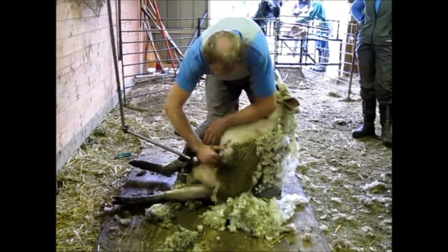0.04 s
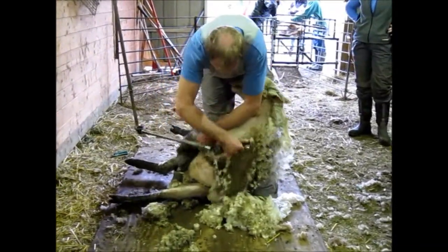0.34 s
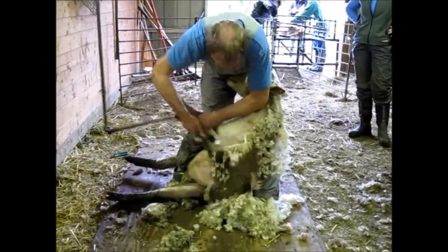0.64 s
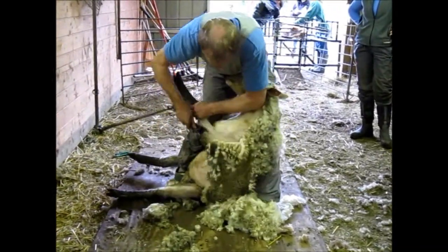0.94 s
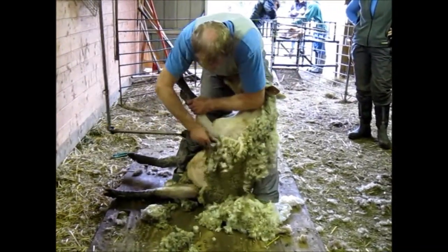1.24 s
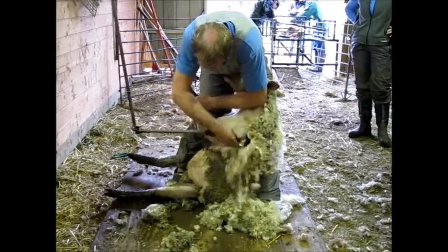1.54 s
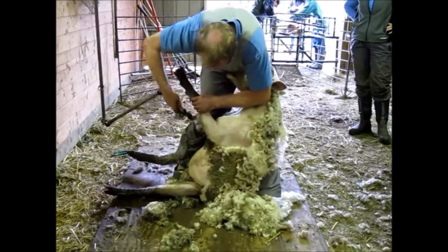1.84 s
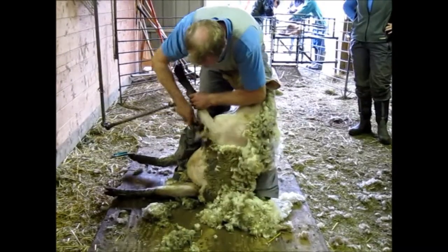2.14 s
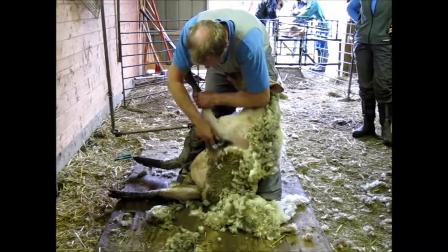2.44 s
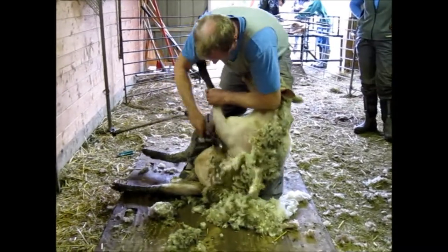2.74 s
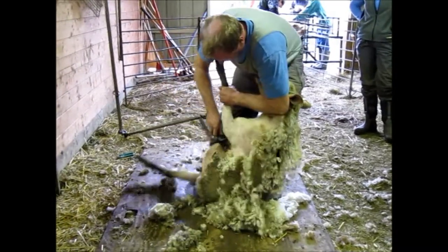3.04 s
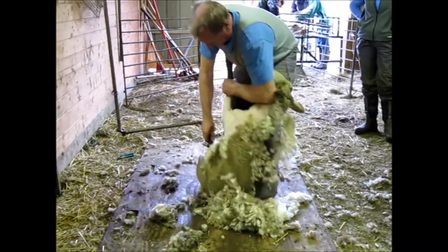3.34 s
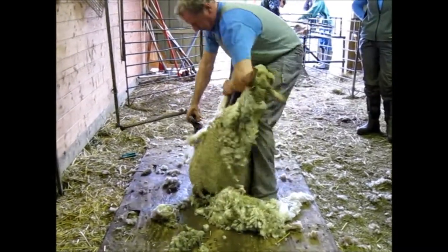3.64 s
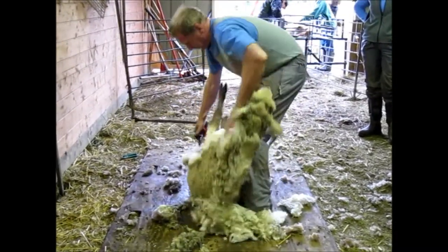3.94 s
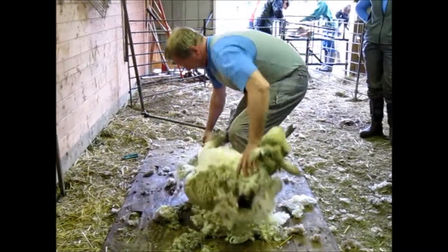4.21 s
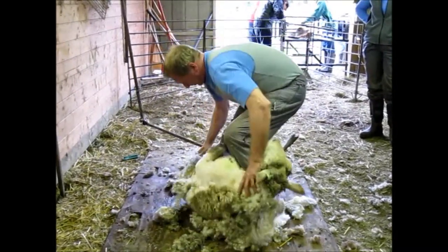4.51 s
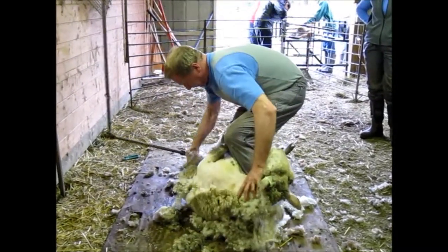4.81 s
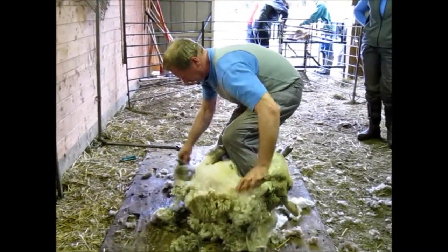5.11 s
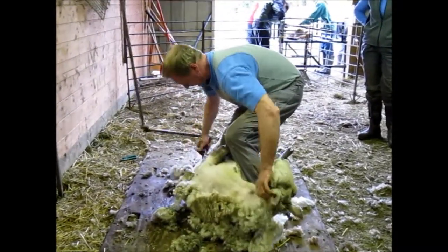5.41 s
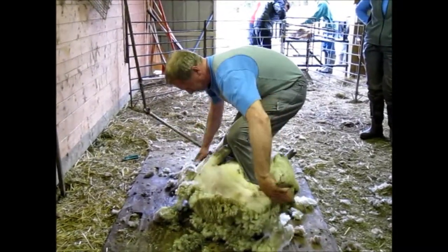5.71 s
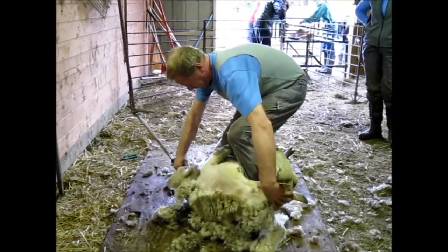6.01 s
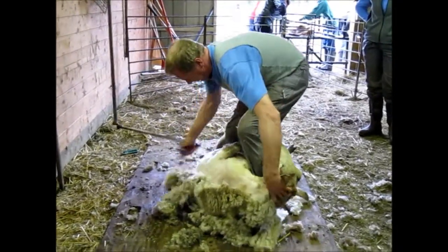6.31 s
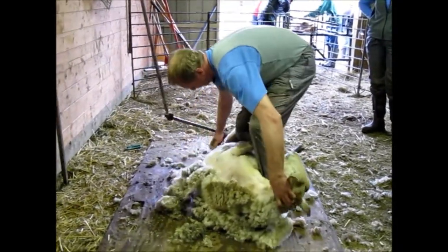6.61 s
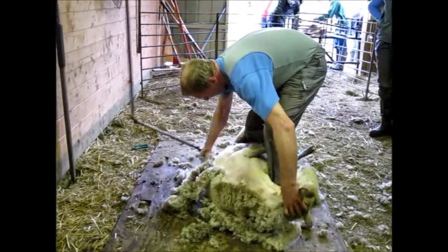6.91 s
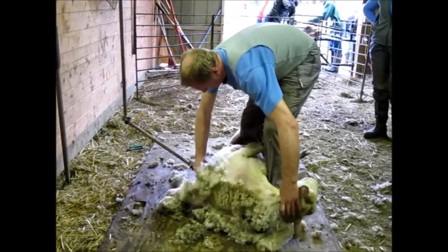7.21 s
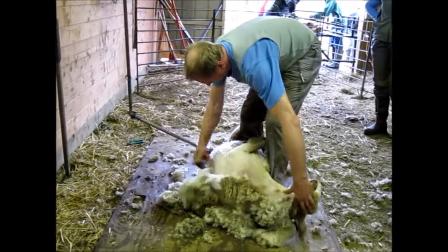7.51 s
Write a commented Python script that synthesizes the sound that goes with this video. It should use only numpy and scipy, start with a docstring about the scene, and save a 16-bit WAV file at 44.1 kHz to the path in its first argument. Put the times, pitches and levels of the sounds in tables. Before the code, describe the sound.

Steady, high metallic buzz of powered sheep shears, with a rattling drive shaft and a faint motor hum underneath.

```python
"""In a barn, a sheep is shorn with a shaft-driven handpiece. The cutter slides over the comb, two
strokes to a turn, and clacks in its play; friction and impact excite the resonances of the steel, which
now and then snags or squeaks. The jointed shaft rattles and whirs, and the motor hums overhead.
The sheep bumps on the board as it is turned, and a low handling rumble swells over the barn's air."""
import sys
import numpy as np
from scipy import signal
from scipy.fft import rfft, irfft, next_fast_len
from scipy.io import wavfile
from scipy.ndimage import uniform_filter1d

SR = 44100
rng = np.random.default_rng(int(sys.argv[2]) if len(sys.argv) > 2 else 0)


def wav_record(signal):
    """Record a signal, one row per channel, as 16-bit PCM in the file named by sys.argv[1]."""
    frames = np.transpose(np.atleast_2d(signal))
    bounded = np.clip(frames, -1, 1)
    # unit amplitude maps onto the largest positive 16-bit level
    quanta = np.round(bounded * 32767).astype(np.int16)
    wavfile.write(sys.argv[1], SR, quanta)


N = 332955
TIME = np.arange(N) / SR
FFT_SIZE = next_fast_len(N + SR)
FREQS = np.maximum(np.arange(FFT_SIZE // 2 + 1) * SR / FFT_SIZE, 1)


# Loudness of the blades as the handpiece is worked. Each row: time in seconds, relative level in dB.
BLADE_LEVEL = [(0.0, -43), (0.44, -42), (1.39, -43.5), (2.17, -42.5), (2.54, -45), (2.88, -42), (3.15, -44),
               (3.61, -43.5), (3.64, -41.5), (4.02, -44), (4.33, -41.5), (4.63, -45), (4.9, -44),
               (5.05, -47), (5.34, -42.5), (5.55, -45), (5.72, -42), (6.2, -44), (6.47, -42), (6.9, -43.5),
               (6.98, -42), (7.55, -43.5)]
# Contour of the blades' treble. Each row: time in seconds, relative level in dB.
TREBLE_LEVEL = [(0.0, -58.5), (0.27, -55.5), (4.06, -56), (5.38, -58), (5.72, -54), (6.18, -63.5),
                (6.5, -54), (6.88, -55), (7.08, -52.5), (7.13, -56.5), (7.53, -62), (7.55, -69)]
# Spectrum of steel sliding on steel. Each row: frequency in Hz, gain in dB.
STEEL_SPECTRUM = [(1000, -39), (2000, -11), (2600, 0), (3300, -2), (4300, 2), (6000, 0.5), (8000, -0.5),
                  (8900, 1.5), (9400, -7), (10800, -5), (12000, -3.5), (13000, -9.5), (14500, -14.5),
                  (15600, -21)]
# Modes of the handpiece. Each row: frequency in Hz, bandwidth in Hz, lift in dB.
HANDPIECE_MODES = [(2340, 100, 3), (3010, 90, 4.5), (3314, 66, 4.5), (3660, 130, 2), (4244, 93, 3.5),
                   (4407, 52, 4), (4930, 100, 0.5), (5320, 90, 2), (5750, 70, 1), (6200, 39, 4),
                   (6620, 99, 2.5), (7080, 280, 3.5), (9060, 120, 2.5), (9620, 180, 6.5), (10430, 480, 2.5)]
# The bare blades grind brighter for a moment. Each row: midpoint in seconds, length in seconds.
BLADE_GRINDS = [(3.68, 0.18), (6.453, 0.13)]

def blades(force, knocks):
    """Friction and impact excite the steel's modes; out of the wool, the comb plate rings more."""
    level_db, = curves(BLADE_LEVEL)
    bare = np.clip((TIME - 3.4) / 0.3, 0, 1)   # 0 in the fleece, 1 clear of it
    contact = force * grains(per_s=26000, spread_db=1.8) + from_db(-16.5) * knocks
    steel = rms_one(filtered(contact, body_response(STEEL_SPECTRUM, HANDPIECE_MODES)))
    bite_db = 3.2 * (force - force.mean()) + 1.3 * drift(40)   # harder contact is brighter
    grind_db = 2.5 * sum(swell(s, length) for s, length in BLADE_GRINDS)
    treble_db = about_mean(TREBLE_LEVEL) - about_mean(BLADE_LEVEL) - 1.1
    treble_band = 1 / (1 + (9200 / FREQS) ** 8)
    steel = band_gain(steel, treble_band, treble_db + grind_db + bite_db)
    cutter_db, plate_db = -1.2 + 0.2 * bare, 1.3 + bare
    steel = band_gain(steel, np.abs(resonance(4200, 520)) ** 2, cutter_db)
    for plate_hz in (3740, 6290):
        steel = band_gain(steel, np.abs(resonance(plate_hz, 130)) ** 2, plate_db + 1.3 * drift(21))
    return from_db(level_db + 1.36) * steel


def stroke_force(turns, bite_db, limp_db, uneven_db, shake_hz, shake_db):
    """Reciprocation: contact force peaks twice a turn, harder one way; the drive adds a slower shake."""
    angle = 2 * np.pi * turns
    bite = np.sin(2 * angle + 1) + np.sin(4 * angle + 2) / 3
    limp = np.cos(angle - 1)
    shake = np.sin(2 * np.pi * shake_hz * TIME + 0.33 * drift(0.93))
    return rms_one(from_db(bite_db * bite + limp_db * limp + shake_db * shake + uneven_db * drift(60)))


def clacks(turns, jitter_s, spread_db):
    """Backlash: the cutter crosses its play and strikes at each reversal, never quite on time."""
    reversals = np.flatnonzero(np.diff(np.floor(2 * turns)) > 0)
    lateness, strength = rng.standard_normal((len(reversals), 2)).T
    strikes = np.clip(reversals + (jitter_s * SR * lateness).astype(int), 0, N - 1)
    impulses = np.zeros(N)
    impulses[strikes] = from_db(spread_db * np.clip(strength, -2, 2))
    return rms_one(impulses)


# Thin ring of the comb's teeth. Each row: time in seconds, relative level in dB before scaling.
COMB_LEVEL = [(0.0, -52), (0.06, -59), (0.71, -52), (1.47, -58), (2.27, -51), (2.48, -55), (3.57, -52.5),
              (3.85, -61), (5.3, -56), (5.34, -49), (5.36, -50), (5.72, -66), (5.74, -53.5), (6.29, -59),
              (6.43, -48.5), (6.83, -58.5), (7.13, -52), (7.55, -57)]
# Their pitch shifts with the pressure on them. Each row: time in seconds, centre frequency in Hz.
COMB_CENTRE = [(0, 11380), (1.6, 11350), (2.1, 11600), (2.7, 11450), (3.5, 11200), (5.1, 11260),
               (5.8, 11200), (6.7, 11200), (7.55, 11200)]

def comb_ring(force):
    """Narrow-band noise: random contacts make the teeth sizzle around one moving frequency."""
    centre_hz, = curves(COMB_CENTRE)
    level_db = -55.2 + 1.4 * about_mean(COMB_LEVEL) + 0.8 * drift(12)
    contact = force ** 2 * grains(per_s=3300, spread_db=1.5)
    sizzle = rms_one(filtered(contact, 1 / (1 + 1j * FREQS / 210) ** 2))
    carrier = np.sin(2 * np.pi * np.cumsum(centre_hz) / SR + drift(120))
    return from_db(level_db) * sizzle * carrier


# Rattle of the shaft as the arm swings it. Each row: time in seconds, relative level in dB.
RATTLE_LEVEL = [(0.0, -54), (0.36, -51.5), (0.78, -54), (1.95, -53), (3.51, -54.5), (4.46, -54.5),
                (4.64, -57), (5.28, -56), (5.3, -53), (5.53, -53), (5.55, -55.5), (5.84, -52.5),
                (6.12, -56.5), (6.39, -54), (6.43, -51), (7.55, -55.5)]
# Spectrum of the rattle. Each row: frequency in Hz, gain in dB.
RATTLE_SPECTRUM = [(250, -20), (420, -18), (540, -12), (660, -3), (790, -13.5), (880, -1.5), (1100, -3),
                   (1250, -5), (1380, -9.5), (1520, -4.5), (1630, 2), (2200, 0.5), (2700, -17),
                   (4000, -17.5)]
# The elbow joint bends. Each row: midpoint in seconds, length in seconds, rise of its ring in dB.
ELBOW_FLEXES = [(.02, .16, 5), (.5, 0.48, 2), (3.2, 1, 1), (5.28, 0.47, 5.5), (6.78, 0.55, 1.5)]

def shaft_rattle(force, knocks):
    """Impact noise: loose joints strike their tube in step with the strokes; a bending elbow rings."""
    level_db, = curves(RATTLE_LEVEL)
    elbow_db = -1.3 + sum(db * swell(s, length) for s, length, db in ELBOW_FLEXES)
    contact = np.sqrt(force) * grains(per_s=5000, spread_db=2.0) + from_db(-13) * knocks
    rattle = rms_one(filtered(contact, body_response(RATTLE_SPECTRUM)))
    return from_db(level_db - 0.2) * band_gain(rattle, np.abs(resonance(1130, 400)) ** 2, elbow_db)


# The grip damps and frees the barrel. Each row: time in seconds, relative level in dB before scaling.
BARREL_LEVEL = [(0.0, -52.5), (1.28, -52), (1.51, -56.5), (1.66, -51.5), (2.37, -53.5), (2.54, -56),
                (2.59, -53.5), (4.29, -52.5), (5.0, -56), (5.76, -52.5), (6.33, -54), (6.35, -50),
                (7.51, -54), (7.55, -53)]

def barrel_ring(force):
    """Modal resonance: small ticks keep two close modes of the handpiece's barrel ringing."""
    level_db = -54 + 1.36 * about_mean(BARREL_LEVEL) + 0.65 * drift(9)
    ticks = np.sqrt(force) * grains(per_s=2500, spread_db=4.0)
    modes = resonance(2761, 90) + from_db(-6.5) * resonance(2688, 80)
    return from_db(level_db) * rms_one(filtered(ticks, resonance(2830, 420) * modes))


# The cutter snags and snaps free. Each row: start in seconds, relative strength in dB.
CUTTER_SNAGS = [(3.7994, -28), (3.89, -24), (4.5007, -25), (4.532, -30), (4.547, -29), (6.347, -24),
                (6.4314, -32), (6.4474, -25), (6.459, -30)]

def snags(decay_s, gain_db):
    """Impulse excitation: a sudden release and a short rasp ring the modes of the handpiece."""
    t = TIME[:SR // 20]
    contact = np.zeros(N + len(t))
    for s, db in CUTTER_SNAGS:
        start = round(s * SR)
        snap = t == 0
        rasp = 0.21 * rng.standard_normal(len(t)) * np.exp(-t / decay_s)
        contact[start:start + len(t)] += from_db(db + gain_db) * (snap + rasp)
    return filtered(contact[:N], body_response(STEEL_SPECTRUM, HANDPIECE_MODES))


# Squeaks of the blades. Each row: midpoint in seconds, length in seconds, pitch in Hz,
# glide in Hz per second, peak level in dB.
BLADE_SQUEAKS = [(.09, 0.045, 4160, 1502, -46), (0.267, 0.06, 4170, -2000, -49),
                 (0.492, 0.049, 4190, 1000, -44), (0.648, .05, 4600, 3000, -43.5),
                 (0.74, .05, 4210, -2000, -47), (1.547, 0.096, 4190, 2987, -48),
                 (2.07, 0.075, 2830, 9, -45.5), (5.335, 0.032, 11170, 0, -46), (6.438, .014, 11400, 0, -42),
                 (6.526, .012, 11400, -7, -44), (6.547, 0.013, 11500, 0, -43),
                 (6.571, 0.0091, 11500, 0, -38)]

def squeaks():
    """Stick-slip friction: steel catches and slides for a moment, giving a rough, gliding note."""
    out = np.zeros(N)
    roughness = drift(150)
    for s, length, hz, glide, peak_db in BLADE_SQUEAKS:
        near = np.abs(TIME - s) < length / 2
        t = TIME[near] - s
        phase = 2 * np.pi * (hz + glide * t / 2) * t + roughness[near]
        out[near] += from_db(peak_db) * np.cos(np.pi * t / length) * np.sin(phase)
    return out


# Partials of the drive. Each row: order (multiple of the rotation rate), rms level in dB.
DRIVE_ORDERS = [(2, -94), (3, -78), (7, -77.5), (19.3, -72), (22, -75.5), (24, -71), (26, -73.5),
                (32, -76.5)]
# The flexing shaft tube swells into resonance. Each row: midpoint in seconds, length in seconds,
# order, relative peak level in dB.
TUBE_RESONANCES = [(0.014, 0.11, 14, -62), (0.204, 0.22, 5, -70), (.32, 0.69, 14, -71),
                   (0.804, 0.2, 14, -61), (1.107, .18, 14, -64), (1.38, .2, 14, -67), (1.53, 0.21, 14, -66),
                   (2.1, 0.53, 5, -74), (2.11, 0.26, 14, -63), (2.847, 0.62, 14, -68),
                   (3.657, 0.11, 14, -63), (4.134, 0.13, 14, -60), (5.65, 0.25, 14, -72),
                   (5.947, 0.21, 14, -68), (6.43, 0.16, 14, -66), (6.734, .2, 5, -68),
                   (7.023, 0.17, 5, -73), (7.03, 0.35, 14, -63)]

def whir(turns, flutter):
    """Forced vibration: the drive sounds at multiples of its rotation rate; its tube swells on two."""
    def partial(order, waver_rad):
        amplitude = 1 + flutter * drift(20)
        return rms_one(amplitude * np.sin(2 * np.pi * order * turns + waver_rad * drift(4.1)))

    def tube(order, rest_db, unsteady_db, waver_rad):
        rest = from_db(rest_db + unsteady_db * drift(7.6))
        swells = sum(from_db(db) * swell(s, length)
                     for s, length, k, db in TUBE_RESONANCES if k == order)
        return (rest + swells) * partial(order, waver_rad)

    drone = from_db(-3) * tube(order=14, rest_db=-69, unsteady_db=1.0, waver_rad=1.1)
    growl = tube(order=5, rest_db=-74.5, unsteady_db=1.6, waver_rad=0.68)
    return drone + growl + sum(from_db(db) * partial(k, waver_rad=0.48) for k, db in DRIVE_ORDERS)


# Rotor, mains hum and a thin whine. Each row: frequency in Hz, rms level in dB, waver in radians.
MOTOR_TONES = [(29.6, -66, .02), (120, -65.5, 0.033), (1754, -75, 0.67)]

def motor():
    """Periodic vibration: the motor gives steady tones, each wandering slightly in phase."""
    return sum(from_db(db) * rms_one(np.sin(2 * np.pi * hz * TIME + waver * drift(3.1)))
               for hz, db, waver in MOTOR_TONES)


# The sheep bumps the board. Each row: time of greatest force in seconds, relative peak level in dB.
SHEEP_BUMPS = [(3.07, -55), (3.365, -52), (3.41, -57), (3.85, -52), (4.98, -57), (5.42, -58), (6.48, -62)]
# Modes of the board. Each row: frequency in Hz, gain in dB, time to decay by 60 dB in seconds.
WOOD_MODES = [(100, 1, .09), (143, 22, 0.11), (181, 14, 0.07), (240, -8, .07), (310, -8, .06)]

def bumps(rise_s, gain_db):
    """Damped vibration: soft, scuffing blows of body and hooves excite the low modes of the board."""
    board = sum(from_db(db) * resonance(hz, np.log(1000) / np.pi / t60) for hz, db, t60 in WOOD_MODES)
    out = np.zeros(N)
    for s, peak_db in SHEEP_BUMPS:
        age = np.clip((TIME - s) / rise_s + 1, 0, 50)   # in rise times
        thud = filtered(age * np.exp(-age) * rng.standard_normal(N), board)
        out += from_db(peak_db + gain_db) * thud / np.abs(thud).max()
    return out


# Swells of low handling rumble. Each row: midpoint in seconds, length in seconds, top level in dB.
RUMBLE_SWELLS = [(.25, 0.82, -72), (5.42, 0.3, -74), (6.55, 0.45, -70), (7.0, .55, -69.5)]
# Spectrum of the rumble, with a dull scuffing of straw. Each row: frequency in Hz, gain in dB.
RUMBLE_SPECTRUM = [(15, -1), (60, 9.5), (160, 1.5), (280, -3.5), (420, -7.5), (520, -0.5), (800, -16),
                   (2000, -26.5)]

def handling_rumble():
    """Contact noise: many tiny impulses merge into a low handling rumble and a dull scuffing of straw."""
    floor = from_db(-72 + 1.3 * drift(6.2))
    swells = sum(from_db(db) * swell(s, length) for s, length, db in RUMBLE_SWELLS)
    rumble = filtered(grains(per_s=2500, spread_db=2.0), body_response(RUMBLE_SPECTRUM))
    return (floor + swells) * rms_one(rumble)


# Background of the barn. Each row: frequency in Hz, gain in dB.
AIR_SPECTRUM = [(12, -4), (20, 12), (40, 0.5), (60, -8), (90, -4), (150, -4), (200, -8.5), (280, -9),
                (420, -15), (1000, -28), (4000, -49)]

def barn_air():
    """Ambient noise: a steady random rumble, strongest at the lowest frequencies."""
    return from_db(-68) * rms_one(filtered(rng.standard_normal(N), body_response(AIR_SPECTRUM)))


def barn_reverb(direct, t60_s, wet_db, move_hz):
    """Reverberation: a diffuse tail, its pattern shifting as the hand moves; the level is preserved."""
    t = TIME[:SR // 2]
    room = 0
    for _ in range(6):
        tail = rng.standard_normal(len(t)) * from_db(-60 * t / t60_s) * (t > 0.004)
        room = room + drift(move_hz) * signal.fftconvolve(direct, tail / np.linalg.norm(tail))[:N]
    direct_power, room_power = [uniform_filter1d(x ** 2, SR // 8) + 1e-18 for x in (direct, room)]
    wet = from_db(wet_db)
    return (direct + wet * room * np.sqrt(direct_power / room_power)) / np.hypot(1, wet)


def from_db(db):
    """Amplitude ratio of a level in decibels."""
    return 10 ** (np.asarray(db) / 20)


def rms_one(x):
    """Normalisation to unit rms."""
    return x / np.sqrt(np.mean(x ** 2) + 1e-20)


def curves(rows):
    """Linear interpolation in time: one curve for each column after the first."""
    times, *columns = np.transpose(rows)
    return [np.interp(TIME, times, column) for column in columns]


def about_mean(rows):
    """Deviation of a level curve from its mean, in dB."""
    db, = curves(rows)
    return db - db.mean()


def swell(middle_s, length_s):
    """Raised-cosine envelope of height 1."""
    return np.cos(np.pi * np.clip((TIME - middle_s) / length_s, -0.5, 0.5)) ** 2


def drift(rate_hz):
    """Random modulation: low-pass noise of unit rms."""
    t = np.arange(2 ** 15) * 16 / SR
    hz = np.arange(len(t) // 2 + 1) / t[-1]
    spectrum = rfft(rng.standard_normal(len(t))) / (1 + (hz / rate_hz) ** 2)
    return rms_one(np.interp(TIME, t, irfft(spectrum)))


def grains(per_s, spread_db):
    """Shot noise: tiny contacts of uneven size at random moments, with unit rms."""
    sizes = from_db(spread_db * np.minimum(rng.exponential(1, N), 4)) * rng.choice([-1, 1], N)
    return rms_one(sizes * (rng.random(N) < per_s / SR))


def filtered(x, response):
    """Linear filtering: the spectrum is multiplied by a frequency response."""
    return irfft(rfft(x, FFT_SIZE) * response, FFT_SIZE)[:N]


def resonance(hz, width_hz):
    """Response of a damped oscillator, with gain 1 at its peak."""
    return 1 / (1 + 1j * (FREQS ** 2 - hz ** 2) / (FREQS * width_hz))


def body_response(spectrum, modes=()):
    """Transfer function of a body: a broad spectral envelope with any modes standing out of it."""
    hz, db = np.transpose(spectrum)
    response = from_db(np.interp(np.log(FREQS), np.log(hz), db))
    for centre, width, lift_db in modes:
        response = response * (1 + (from_db(lift_db) - 1) * resonance(centre, width))
    return response


def band_gain(x, band, gain_db):
    """Time-varying equalisation: one band rises or falls along a curve."""
    return x + (from_db(gain_db) - 1) * filtered(x, band)


# Rotation of the drive. Each row: time in seconds, speed in turns per second.
DRIVE_SPEED = [(0, 44.38), (2.0, 44.36), (2.8, 44.41), (3.6, 44.35), (4.8, 44.44), (5.6, 44.28),
               (6.2, 44.4), (7.55, 44.35)]

def scene():
    """Superposition: one rotation times cutter and shaft; the duller sounds of the barn add to them."""
    speed, = curves(DRIVE_SPEED)
    turns = np.cumsum(speed) / SR
    cutter_turns = turns + 0.2 + 0.12 * drift(1.5)   # the joints lead and lag as the arm swings
    force = stroke_force(cutter_turns, bite_db=1.4, limp_db=0.74, uneven_db=0.64,
                         shake_hz=31.0, shake_db=0.47)
    knocks = clacks(cutter_turns, jitter_s=0.0016, spread_db=2.5)
    shears = blades(force, knocks) + comb_ring(force) + shaft_rattle(force, knocks) + barrel_ring(force)
    shears += snags(decay_s=0.0011, gain_db=4) + squeaks()
    air = barn_air()
    drive = whir(turns, flutter=0.37) + motor()
    shears = barn_reverb(shears, t60_s=0.47, wet_db=-8.5, move_hz=4.6)
    return (shears + drive + bumps(rise_s=0.015, gain_db=0.5) + handling_rumble() + air)[None]


def record(dry):
    """Band limiting: a steep low-pass filter removes the highest treble."""
    cutoff_hz = 15700
    return filtered(dry[0], 1 / (1 + (FREQS / cutoff_hz) ** 400))[None]


dry = scene()
out = record(dry)
wav_record(out)
```